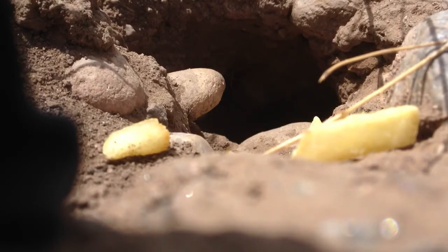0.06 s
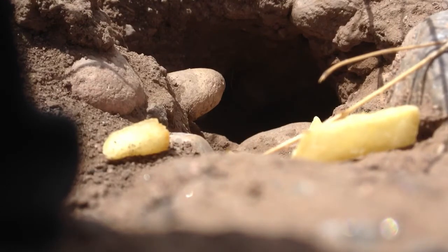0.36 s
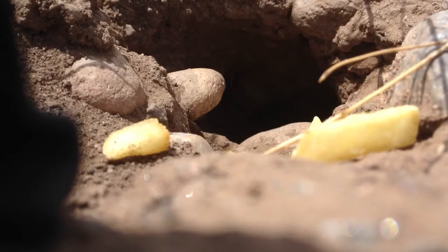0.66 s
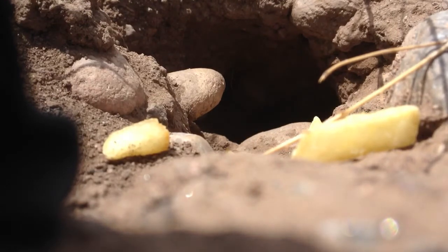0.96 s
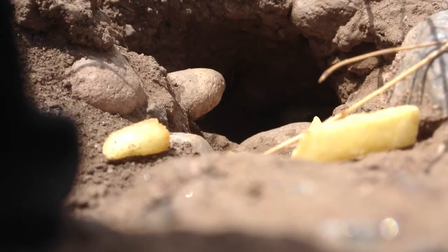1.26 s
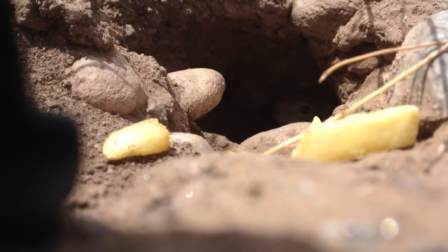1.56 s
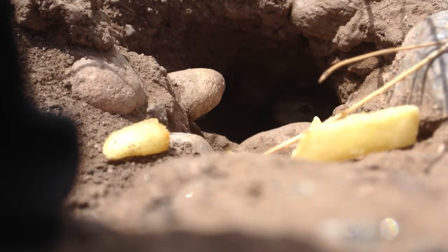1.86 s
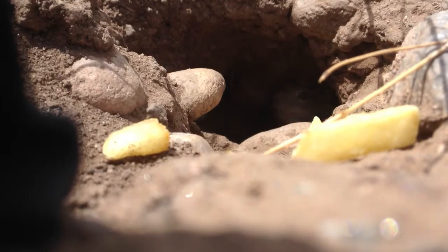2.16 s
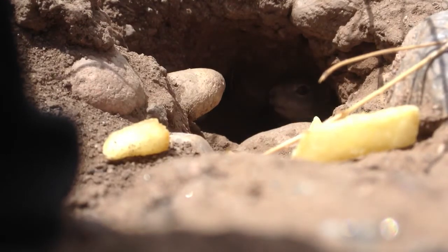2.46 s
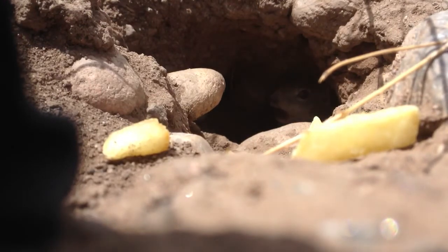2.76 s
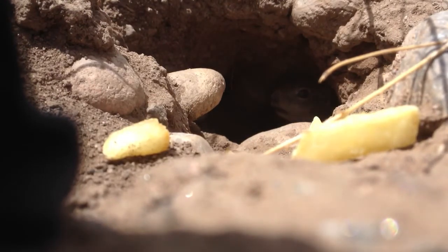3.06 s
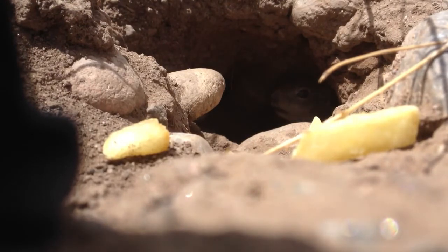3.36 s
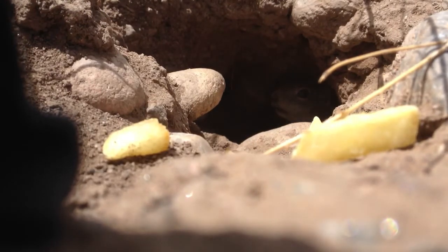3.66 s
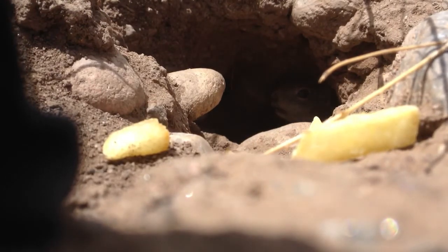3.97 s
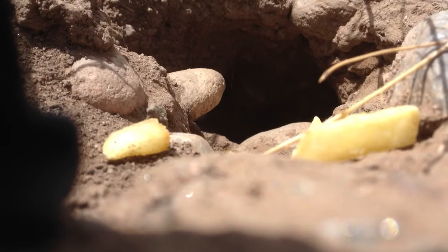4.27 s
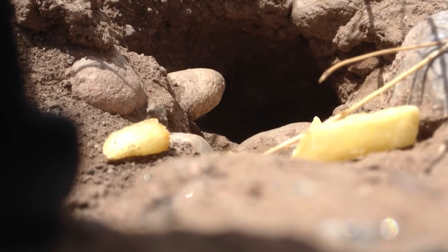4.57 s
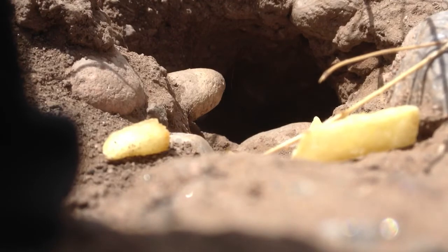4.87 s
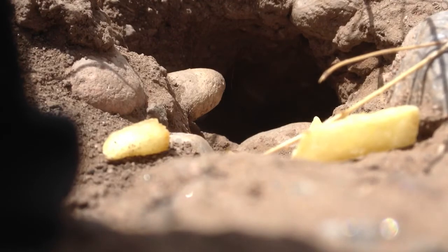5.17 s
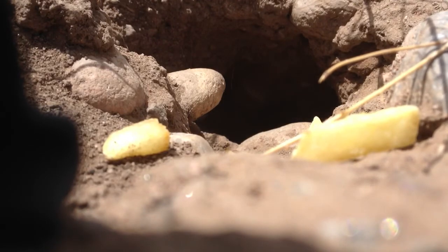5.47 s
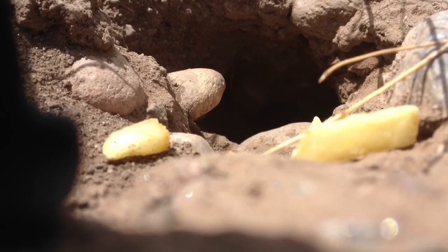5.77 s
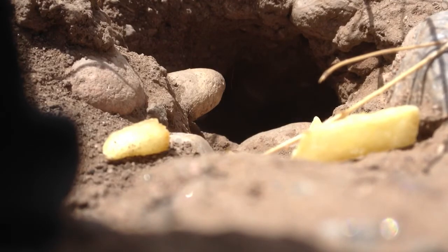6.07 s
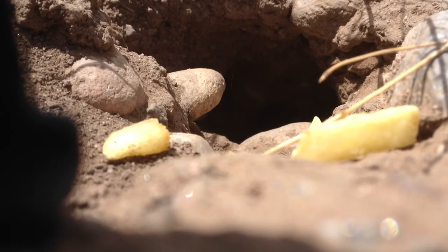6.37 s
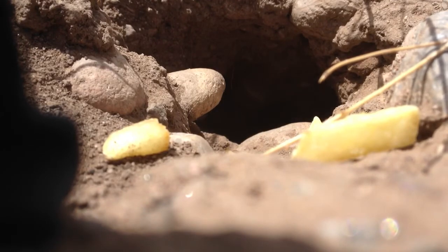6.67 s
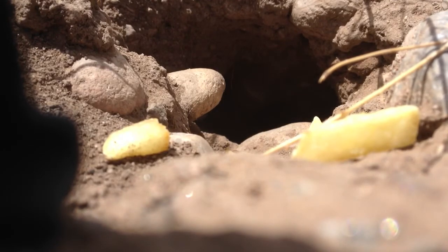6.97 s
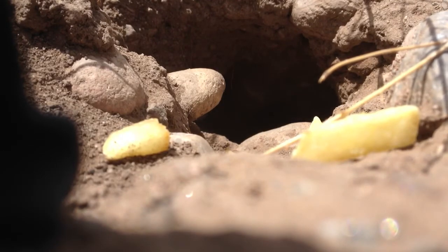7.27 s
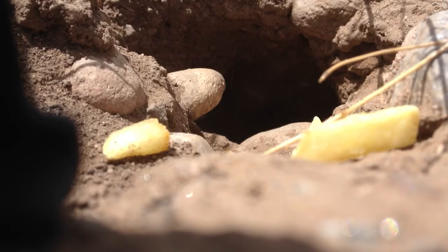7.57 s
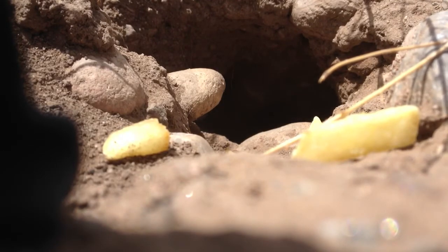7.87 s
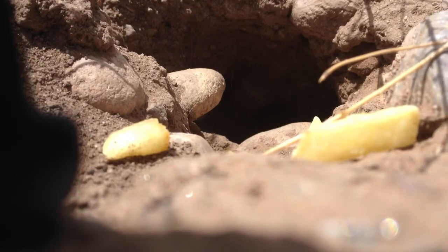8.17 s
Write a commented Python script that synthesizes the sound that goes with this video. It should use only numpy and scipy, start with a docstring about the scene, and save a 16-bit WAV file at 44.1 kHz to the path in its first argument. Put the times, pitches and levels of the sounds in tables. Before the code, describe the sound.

A soft, low rumble of distant engines and a thin hiss run throughout, outdoors, with faint vehicle tones slowly rising and fading in the first three seconds and again from about 3.6 to 7 seconds. At about 2.6 seconds a ground squirrel, close by in its burrow, gives a shrill alarm trill: four rapid, nearly pure whistled pips lasting under a fifth of a second. Similar trills follow at 4.1 seconds, at 5.9 seconds with five slightly lower pips, and at 7.9 seconds with three. They are by far the loudest sounds and have almost no echo. Very faint ticks of grit come between 2 and 5.5 seconds, and tiny mouth clicks sit near the first and last trills. Two thin, barely audible bird whistles sound far off just before 3 seconds, and a distant bird gives two faint nasal calls around 7.3 seconds.

```python
"""Distant engines rumble under a thin hiss; then a small ground squirrel, hidden in its burrow, gives
four quick alarm trills, the loudest sound by far. Each is a run of shrill pips: nearly pure whistles
whose pitch contour follows throat tension and whose overtones grow with pressure. Rocks reflect them
weakly. There are faint ticks: bright grit underfoot, and short, duller mouth clicks near the trills.
Two thin whistles sound far off, and near the end a far bird calls twice through a throat resonance."""
import sys
import numpy as np
from scipy import signal
from scipy.fft import rfft, irfft, next_fast_len
from scipy.io import wavfile

SR = 44100
rng = np.random.default_rng(int(sys.argv[2]) if len(sys.argv) > 2 else 0)


def int16_out(signal):
    """Quantize to a 16-bit WAV file."""
    q = np.round(np.clip(np.atleast_2d(signal).T, -1, 1) * 32767)
    wavfile.write(sys.argv[1], SR, q.astype(np.int16))


N = 362943

# alarm pips: t/s, duration/s, f/Hz, level/dB, second harmonic/dB re fundamental
ALARM_PIPS = [(2.6086, .011, 5250, -18.5, -50), (2.6449, 0.024, 5193, -5.5, -29.5),
              (2.6916, .026, 5200, -3.5, -24), (2.7412, 0.025, 5074, -6, -22),
              (4.0790, 0.023, 5157, -6, -26.5), (4.125, .026, 5120, -7.5, -21.5),
              (4.1755, .024, 5085, -12.5, -21), (4.2258, 0.022, 4874, -7.5, -30),
              (5.8953, .012, 4910, -14.5, -42), (5.9284, 0.028, 4913, -7, -39),
              (5.9720, 0.031, 4880, -4.5, -41.5), (6.0226, .029, 4853, -3.5, -54),
              (6.0877, .012, 4860, -13, -45), (7.9194, .029, 4636, -11.5, -35),
              (7.9628, .031, 4767, -7.5, -38), (8.014, 0.026, 4720, -10, -36)]
def squirrel():
    """Pulse trains: each trill is a run of pips, about twenty a second."""
    out = np.zeros(N)
    for start, *shape in ALARM_PIPS:
        add(out, start, pip(*shape))
    return out


RELAXED_HZ, TIGHT_HZ, SLACK_TENSION = 4838, 5114, -.17   # pitch at tension 0 and 1; lowest tension
ATTACK_S, TIGHT_ATTACK_S, PEEP_ATTACK_S, RELEASE_S = .002, .0017, .0036, .014
# pitch contour common to all pips: fraction of duration, frequency ratio
PIP_CONTOUR = [(0, 0.994), (.3, 0.997), (.55, .997), (.8, .985), (1, .996)]
# third harmonic, faint unless it meets the mouth's resonance: f/Hz, level/dB re fundamental
MOUTH_RESPONSE = [(13860, -32.5), (14300, -41.5), (14700, -41), (15200, -24), (15400, -37.5), (15650, -39)]
def pip(length, pitch_hz, level_db, second_db, settle_s=.0016, lift_from=.82, jitter=.0051):
    """Frequency modulation by tension: a tight throat drops onto its pitch and ends in an upward flick."""
    t = np.arange(int(length * SR)) / SR
    along = t / t[-1]
    peep = length < RELEASE_S   # the shortest pips swell softly, without a swoop
    tension = 0 if peep else np.clip((pitch_hz - RELAXED_HZ) / (TIGHT_HZ - RELAXED_HZ), SLACK_TENSION, 1)
    tight, slack = max(tension, 0), np.clip(tension / SLACK_TENSION, 0, 1)
    swoop, lift = .14 * tension, .08 * tension   # fractions of pitch; a slack throat scoops from below
    attack = PEEP_ATTACK_S if peep else np.interp(tight, [0, 1], [ATTACK_S, TIGHT_ATTACK_S])
    # the harder the swoop, the more abruptly the whistle reaches full strength
    opening = (1 - np.exp(-(t / attack) ** 3)) * (1 - (.45 - 2.6 * swoop) * np.exp(-t / .0053))
    closing = np.sin(np.pi / 2 * np.clip((t[-1] - t) / RELEASE_S, 0, 1)) ** 1.3
    pressure = opening * closing
    settling = np.exp(-np.maximum(t - attack / 2, 0) / settle_s)
    flick = np.clip((along - lift_from) / (1 - lift_from), 0, 1) ** .7
    # flutter moves loudness and pitch together, most in a slack throat blown hard
    flutter = (.033 + .96 * slack * from_db(level_db) ** 2) * drift(260, len(t))
    ratio = np.interp(along, *np.transpose(PIP_CONTOUR)) + swoop * settling + lift * flick + .04 * flutter
    phase = phase_of(pitch_hz * (ratio + jitter * drift(940, len(t))))
    second = from_db(second_db) * np.sin(2 * phase)
    third = from_db(np.interp(3 * pitch_hz, *np.transpose(MOUTH_RESPONSE))) * np.sin(3 * phase)
    tone = np.sin(phase) + np.sqrt(pressure) * (second + third)
    rasp = band_noise(5060, .62, len(t)) + from_db(-15.5) * band_noise(12800, .36, len(t))
    rasp *= from_db(np.interp(tight, [0, 1], [-44.5, -39]))
    # a hard swoop also makes the first moment rough
    scrape = band_noise(6430, .19, len(t)) + .0798 * band_noise(13000, .4, len(t))
    scrape *= 1.3 * swoop * settling
    return from_db(level_db) * pressure * (1 + flutter) * (tone + rasp + scrape)


# reflections from the surrounding rocks: delay/s, level/dB re direct sound
ROCK_ECHOES = [(0.012, -52), (0.018, -54), (.034, -53), (.043, -48), (.055, -48.5)]
def rocks(direct, tail_db=-50, t60_s=.3):
    """Reflection and scattering: a few weak echoes and a short, exponentially decaying tail."""
    echoes = np.zeros(N)
    for delay, db in ROCK_ECHOES:
        add(echoes, delay, from_db(db) * direct)
    t = np.arange(SR // 3) / SR
    scatter = rng.standard_normal(len(t)) * from_db(-60 * t / t60_s)
    return echoes + from_db(tail_db) * signal.fftconvolve(direct, scatter / np.linalg.norm(scatter))[:N]


# bright grit underfoot, and duller mouth clicks near the trills: t/s, level/dB, centre f/Hz
FAINT_TICKS = [(2.052, -66, 11000), (2.418, -61, 11500), (2.484, -66, 12000), (2.596, -51, 5000),
               (2.802, -56, 7200), (4.571, -58, 9500), (5.158, -60, 11500), (7.881, -39, 5000)]
def grit_and_mouth_clicks(trickle_from_s=5.23, trickle_to_s=5.38, grains=4):
    """Damped transients: each tick is a tiny noise burst; a few fine grains trickle after a step."""
    out, t = np.zeros(N), np.arange(SR // 16) / SR
    spacing = (trickle_to_s - trickle_from_s) / grains
    moments = trickle_from_s + spacing * (np.arange(grains) + rng.random(grains))
    trickle = [(start, -67, 11800) for start in moments]
    for start, db, hz in FAINT_TICKS + trickle:
        decay_s = .0045 * (hz / 11000) ** 2   # the duller the tick, the shorter it is
        add(out, start, from_db(db) * np.exp(-t / decay_s) * band_noise(hz, .6, len(t)))
    return out


# nasal calls: t/s, duration/s, fundamental f/Hz, glide as a fraction of f, level/dB
BIRD_CALLS = [(7.265, 0.094, 371, 0.09, -57), (7.423, 0.102, 354, -0.082, -56.5)]
def far_bird(throat_hz=3550, throat_width_hz=750, fading_db=5):
    """Source and filter: harmonics pass one throat resonance, and each fades on its own over distance."""
    out, orders = np.zeros(N), np.arange(5, 15)[:, None]
    for start, length, hz, glide, db in BIRD_CALLS:
        size = int(length * SR)
        pitch = hz * (1 + glide * np.linspace(-.5, .5, size) + .011 * drift(160, size))
        throat = np.exp(-.5 * ((orders * pitch - throat_hz) / throat_width_hz) ** 2)
        fading = from_db(fading_db * np.array([drift(25.7, size) for _ in orders]))
        call = rms_one((throat * fading * np.sin(orders * phase_of(pitch))).sum(axis=0))
        add(out, start, from_db(db) * np.hanning(size) ** .5 * call)
    return out


# thin bird whistles: t/s, duration/s, initial f/Hz, final f/Hz, level/dB
BIRD_WHISTLES = [(2.815, .12, 12000, 11850, -73), (2.916, .1, 7050, 7500, -66)]
def far_whistles():
    """Linear frequency sweep: each whistle is a lone, slightly unsteady sine."""
    out = np.zeros(N)
    for start, length, from_hz, to_hz, db in BIRD_WHISTLES:
        size = int(length * SR)
        pitch = np.linspace(from_hz, to_hz, size) * (1 + .008 * drift(250, size))
        add(out, start, from_db(db) * np.hanning(size) ** .5 * np.sin(phase_of(pitch)))
    return out


# partials of the steady engine drone: f/Hz, rms level/dB
ENGINE_TONES = [(64, -70.5), (98.83, -63), (132.5, -56.5), (166.5, -55), (173.2, -54.5), (199.7, -52),
                (227, -62.5), (336, -56.5), (497, -59.5), (800, -69.5)]
def engines(fading_db=2.5, wander=.005):
    """Atmospheric fading: far engine tones waver in level and pitch in the moving air."""
    out = np.zeros(N)
    for hz, db in ENGINE_TONES:
        gain = from_db(db + fading_db * drift(4.1, N))
        pitch = hz * (1 + wander * drift(2.976, N))
        out += gain * np.sin(phase_of(pitch))
    return np.sqrt(2) * out


# tones of passing vehicles: t/s, duration/s, initial f/Hz, climb/(Hz/s), rms level after the rise/dB
VEHICLE_TONES = [(.35, 2.6, 271, 29, -50), (0.151, 1.83, 360, 45, -58.5), (3.6, 3.64, 254.5, 9.5, -45.5)]
def vehicles(rise_s=.19, recede_db_per_s=4.5, fading_db=1.8, wander_hz=.8):
    """Attenuation with distance: each tone swells, then fades as its vehicle speeds up and draws away."""
    out, t = np.zeros(N), np.arange(N) / SR
    for start, length, hz, climb, db in VEHICLE_TONES:
        age = np.clip(t - start, 0, length)
        gate = np.clip(np.minimum(age, length - age) / rise_s, 0, 1)
        level_db = db - recede_db_per_s * (age - rise_s) + fading_db * drift(4.5, N)
        pitch = hz + climb * age + wander_hz * drift(4.93, N)
        out += gate * from_db(level_db) * np.sin(phase_of(pitch))
    return np.sqrt(2) * out


def tyres(peak_s=1.0, spread_s=.7, level_db=-64):
    """Rolling noise: one band swells under a Gaussian envelope as the first vehicles pass."""
    t = np.arange(N) / SR
    swell = np.exp(-.5 * ((t - peak_s) / spread_s) ** 2)
    return from_db(level_db) * swell * band_noise(1250, 1.2, N)


# spectrum of the far rumble: f/Hz, relative spectral level/dB
RUMBLE_SPECTRUM = [(20, -49), (45, -37), (75, -17), (115, -2.5), (175, 0), (265, -1), (380, -8), (590, -10),
                   (700, -15.5), (1300, -21), (2000, -29.5), (4000, -53)]
def rumble(midway_db=-44, rise_db_per_s=.19):
    """Spectrally shaped noise: a low rumble whose level creeps upward."""
    from_middle_s = (np.arange(N) - N / 2) / SR
    return from_db(midway_db + rise_db_per_s * from_middle_s) * coloured(RUMBLE_SPECTRUM)


# spectrum of the thin hiss: f/Hz, relative spectral level/dB
HISS_SPECTRUM = [(1500, 0), (2500, 3), (3800, 1.5), (4750, 2), (5050, -5.5), (6800, -2.5), (8100, -6.5),
                 (9200, -17), (10000, -22.5), (12000, -16.5), (15150, -15), (15450, -38.5)]
def hiss(level_db=-61.5, waver_db=.3):
    """Random amplitude modulation: broadband noise wavers slightly in level."""
    return from_db(level_db + waver_db * drift(3, N)) * coloured(HISS_SPECTRUM)


def from_db(db):
    """Amplitude ratio of a level in decibels."""
    return 10 ** (np.asarray(db) / 20)


def rms_one(x):
    """Normalisation to unit rms."""
    return x / np.sqrt(np.mean(x ** 2) + 1e-20)


def add(out, start, sound):
    """Superposition of a sound from `start` seconds on."""
    at = int(round(start * SR))
    out[at:at + len(sound)] += sound[:N - at]


def phase_of(hz):
    """Phase as the time integral of frequency."""
    return 2 * np.pi * np.cumsum(hz) / SR


def drift(rate_hz, size):
    """Low-pass noise: a smooth fluctuation of spread about 1 and bandwidth about `rate_hz`."""
    padded = next_fast_len(size + SR // 8)
    hz = np.arange(padded // 2 + 1) * SR / padded
    gain = np.exp(-.5 * (hz / rate_hz) ** 2)
    return rms_one(irfft(rfft(rng.standard_normal(padded)) * gain, padded))[:size]


def coloured(spectrum):
    """Spectral weighting of white noise, at unit rms."""
    hz, db = np.transpose(spectrum)
    padded = next_fast_len(N)
    bins = np.maximum(np.arange(padded // 2 + 1) * SR / padded, 1)
    gain = from_db(np.interp(np.log(bins), np.log(hz), db))
    return rms_one(irfft(rfft(rng.standard_normal(padded)) * gain, padded)[:N])


def band_noise(centre_hz, octaves, size):
    """Band-pass filtering of white noise, with soft edges and unit rms."""
    edges = np.minimum(centre_hz * 2 ** (octaves * np.array([-.5, .5])), SR / 2 - 1000)
    band = signal.butter(2, edges, "band", fs=SR, output="sos")
    return rms_one(signal.sosfilt(band, rng.standard_normal(size)))


def scene():
    """Superposition: the close trills, their echoes and the ticks over the far background, in mono."""
    trills = squirrel()
    near = trills + rocks(trills) + grit_and_mouth_clicks()
    far = far_bird() + far_whistles() + engines() + vehicles() + tyres() + rumble() + hiss()
    return (near + far)[None]


def record(dry, rolloff_hz=15450, cutoff_hz=16400):
    """Band limiting: the microphone gives out at the very top, and what remains there is cut steeply."""
    dulled = signal.sosfilt(signal.butter(24, rolloff_hz, fs=SR, output="sos"), dry)
    return signal.sosfilt(signal.ellip(10, .1, 80, cutoff_hz, fs=SR, output="sos"), dulled)


dry = scene()
out = record(dry)
int16_out(out)
```